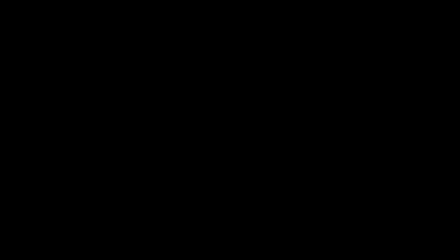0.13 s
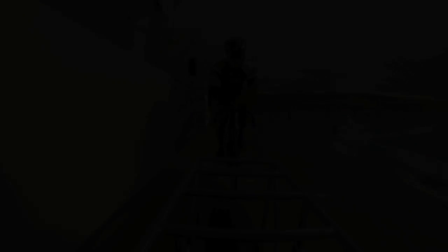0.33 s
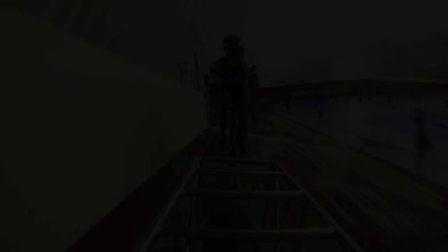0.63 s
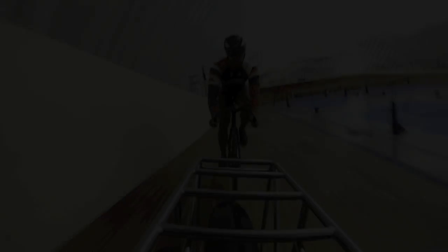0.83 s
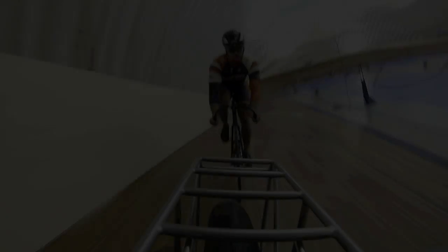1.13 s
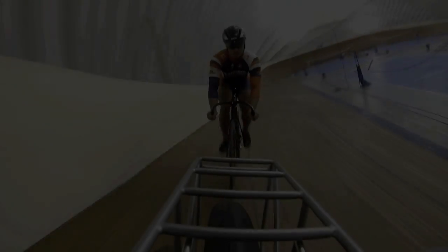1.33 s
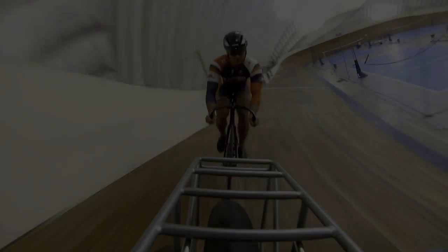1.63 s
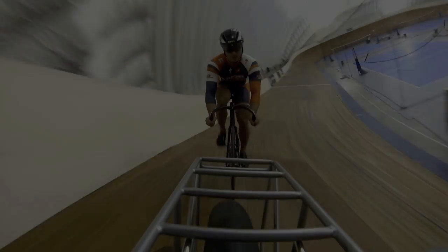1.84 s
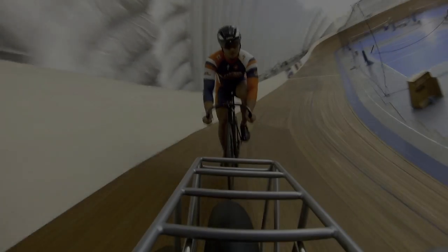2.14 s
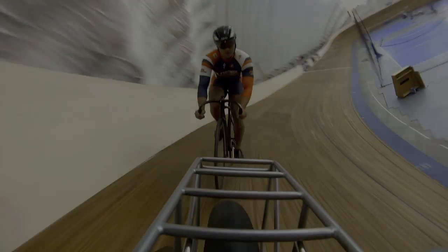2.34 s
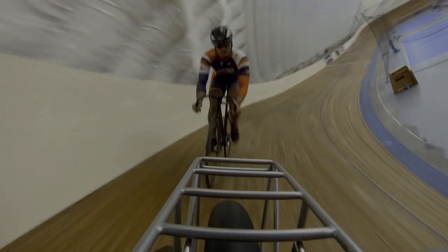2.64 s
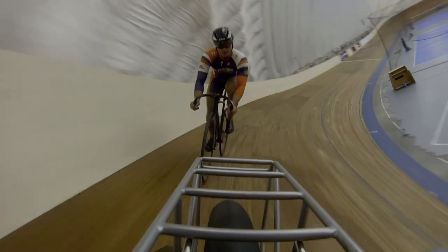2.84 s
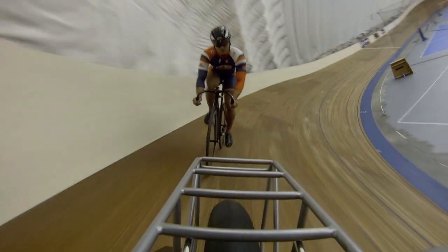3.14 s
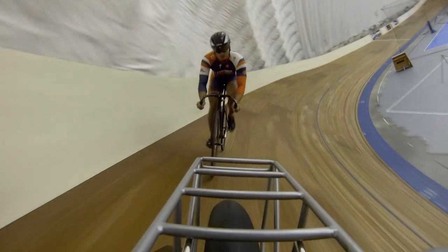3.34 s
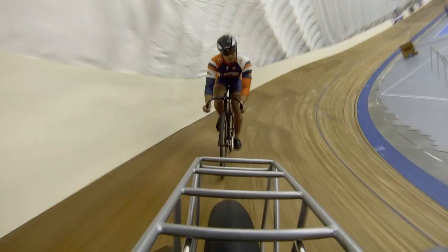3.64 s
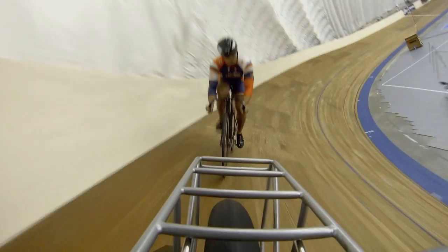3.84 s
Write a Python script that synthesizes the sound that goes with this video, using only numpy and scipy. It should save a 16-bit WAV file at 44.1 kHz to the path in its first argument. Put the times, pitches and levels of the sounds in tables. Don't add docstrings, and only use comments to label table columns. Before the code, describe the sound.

A motorbike drones low and steady on an indoor wooden cycling track, its steel rack humming under grainy road and wind rush; plastic rattles come in clusters as everything fades up from silence, heard from the bike.

```python
import sys
import numpy as np
from scipy import signal
from scipy.fft import rfft, irfft, next_fast_len
from scipy.io import wavfile
from scipy.ndimage import uniform_filter1d, minimum_filter1d, map_coordinates

SR = 44100
rng = np.random.default_rng(int(sys.argv[2]) if len(sys.argv) > 2 else 0)


def materialize(psi):
    bounded = np.clip(np.atleast_2d(psi).T, -1, 1)
    quanta = np.round(bounded * 32767).astype(np.int16)
    wavfile.write(sys.argv[1], SR, quanta)


def invert_db(x):
    u = np.asarray(x, float) / 20
    return 10 ** u


N = 176400

FADE_START_S, FADE_S = 0.071, 3.985

# (time [s], firing rate [Hz], thump level [dB])
ENGINE = [(0.15, 47.5, -54.5), (0.21, 48.2, -45), (0.62, 47.98, -41), (0.96, 48.86, -30),
          (1.24, 48.73, -36), (1.31, 50, -27.5), (1.45, 50.3, -41.5), (1.58, 49.23, -26), (1.7, 48.75, -38),
          (1.9, 48.8, -28.5), (2.45, 49.35, -24.5), (2.62, 47.93, -28.5), (2.79, 47.9, -24),
          (3.08, 47.76, -26.5), (3.31, 50.15, -23.5), (3.36, 50.44, -25.5), (3.47, 48.27, -25),
          (4.0, 48.7, -31)]
FIRING_WANDER, THUMP_WOBBLE_DB, THUMP_NOISE_DB = 0.02, 1.6, -11.5
# (time [s], level [dB])
ROAD_RUSH = [(.1, -37.5), (.5, -33), (1, -38.5), (1.3, -35), (1.57, -32.5), (1.63, -43.5), (1.75, -34),
             (1.93, -33), (2.2, -37), (2.5, -32), (2.75, -37.5), (3.0, -34.5), (3.25, -33.5), (3.6, -34.5),
             (4, -36)]
# (frequency [Hz], level [dB])
RUMBLE_COLOUR = [(12, -13), (22, -2), (50, -6), (85, -15.5), (130, -5), (300, -23.5), (480, -40),
                 (1500, -110)]
RUMBLE_DB = -25
# (time [s], peak level [dB])
LOW_THUDS = [
    (1.305, -29.5),
    (1.448, -18.5),
    (1.561, -18.5),
    (1.581, -18.5),
    (1.94, -15),
    (3.291, -12),
    (3.689, -6),
]
THUD_S = 0.0018

# (frequency [Hz], width [Hz], level [dB])
RACK_MODES = [(156.7, 20, 3), (197, 30, 2), (243, 59, -15.5)]
# (time [s], frequency [Hz], level [dB])
RACK_HUM = [(0.3, 153.9, -49.5), (0.61, 150.3, -36), (0.948, 152.8, -35), (1.06, 160.9, -35.5),
            (1.28, 150.8, -37), (1.388, 162.3, -34.5), (1.552, 154.7, -31), (2.02, 152.8, -30),
            (2.11, 155.9, -25), (2.17, 153.9, -35), (2.66, 155.4, -23), (2.92, 154.2, -26.5),
            (2.96, 152.3, -20.5), (3.29, 153.6, -26.5), (3.339, 153.4, -21.5), (3.45, 148.5, -25.5),
            (3.59, 154.8, -21), (4.0, 151.7, -21)]
HUM_WANDER, HUM_WOBBLE_DB, SHAKE_NOISE_DB = 0.005, 3, -9
# (frequency [Hz], width [Hz], level [dB])
HOLLOW_MODES = [(601, 44.3, 3.5), (675, 146, -6), (1082, 49, -16), (1308, 111, -11.5), (1530, 29, 1),
                (1627, 67, -1), (2134, 317, -5), (2840, 600, -8.5), (4940, 180, -28.5), (5070, 600, -27),
                (5750, 190, -23), (7900, 190, -34)]
# (frequency [Hz], level [dB])
RUSH_TILT = [(300, -36), (540, -2.5), (1000, 10), (3600, -8.5), (4300, -12.5), (4800, -4), (5900, -3),
             (6600, -17.5), (8000, -10), (9000, -53.5)]
# (frequency [Hz], level [dB])
HISS_COLOUR = [(7500, -30), (8800, 1), (10300, -7.5), (12300, 0.5), (14000, -8), (15500, -35.5)]
HISS_DB = -50.5

# (time [s], frequency [Hz], level [dB])
TREAD = [(0.2, 428.5, -44.5), (1.01, 417.5, -48), (1.1, 428, -46), (1.62, 402.6, -40.5), (2.51, 396.6, -40),
         (2.57, 409.7, -35), (2.7, 400.5, -45), (3.05, 410.5, -40.5), (3.33, 402.8, -42.5),
         (3.68, 416.6, -42), (3.76, 404, -37), (4.0, 413.4, -45)]
OCTAVE_DB, TREAD_WANDER, TREAD_WOBBLE_DB = -12.5, 0.00947, 3.5

# (time [s], level [dB])
SQUEAKS = [
    (.24, -64.5),
    (1.458, -40),
    (2.531, -35),
]
SQUEAK_HZ, SQUEAK_S = 2260, 0.023

# (time [s], case peak [dB], shell peak [dB])
CONTACTS = [(0.7058, -41.5, -44), (0.7118, -34, -34.5), (0.7185, -39, -37), (0.8308, -36.5, -42),
            (0.8361, -37, -38.5), (0.9123, -46.5, -53), (0.9171, -57.5, -53.5), (1.1607, -37.5, -49),
            (1.1711, -30.5, -39), (1.1815, -22, -29), (1.1843, -40.5, -33), (1.1909, -29, -32),
            (1.1962, -23.5, -43), (1.1998, -29.5, -28), (1.2054, -24, -33), (1.2115, -26.5, -29),
            (1.2735, -30, -36), (1.2767, -35, -35), (1.2806, -32, -27.5), (1.2838, -33.5, -33.0),
            (1.2876, -28.5, -38), (1.3056, -37.5, -37.5), (1.3318, -50.0, -49), (1.3365, -52, -48),
            (1.4003, -28, -26), (1.4044, -25, -46), (1.4099, -34.5, -33.0), (1.4677, -38.5, -52.0),
            (1.4732, -41.0, -54.0), (1.4766, -45.5, -54), (1.4841, -44, -50), (1.4899, -28, -24),
            (1.8816, -35, -38), (1.9279, -40, -57.0), (1.931, -33.0, -42), (1.9373, -31.5, -42.5),
            (2.0241, -42, -48), (2.054, -29, -25.5), (2.0589, -20, -28), (2.064, -27.0, -35),
            (2.0675, -28.5, -30), (2.0707, -34.5, -28.0), (2.0758, -29, -27), (2.0804, -34.5, -34),
            (2.135, -26, -29), (2.2168, -37, -58), (2.2783, -34.5, -49.0), (2.4383, -53, -48),
            (2.6411, -20, -24), (2.6463, -20, -21), (2.656, -27, -26), (2.6559, -26.0, -45),
                 (2.6615, -26.5, -29.0), (2.747, -45.5, -53), (2.7505, -44.5, -50.0), (2.758, -41.5, -48.0),
                 (2.7603, -37.5, -50), (2.767, -37, -40), (2.778, -32.0, -36.5), (2.9226, -30.5, -45),
                 (2.932, -43, -53), (2.943, -34.5, -46), (3.0665, -34.5, -47), (3.1319, -29.5, -46),
                 (3.1359, -34.5, -46), (3.135, -32.0, -49), (3.144, -48.5, -43), (3.147, -37, -42),
                 (3.177, -33.0, -45.0), (3.182, -24.5, -58), (3.1881, -36.5, -39), (3.1925, -29, -50),
                 (3.1962, -35, -47), (3.281, -31, -44), (3.2827, -27.5, -47), (3.2863, -31.5, -39.0),
                 (3.2929, -21.5, -17.5), (3.298, -34.5, -40), (3.536, -35, -47.5), (3.5575, -40, -44),
                 (3.5634, -32.5, -42), (3.7348, -16.5, -20), (3.7576, -27.5, -20), (3.834, -26.5, -46.0),
                 (3.8384, -24, -44), (3.8434, -34, -40), (3.849, -19.5, -18.5), (3.8532, -26.5, -19),
                 (3.857, -21.5, -22), (3.8609, -15.5, -22), (3.8652, -26.5, -22.0), (3.8703, -19, -15),
                 (3.8788, -19.5, -20.0), (3.9379, -23.5, -22), (3.9435, -27.5, -28.0), (3.9465, -21, -36),
                 (3.9491, -30, -21.5), (3.96, -27, -43.0)]
# (frequency [Hz], width [Hz], level [dB])
CASE_MODES = [(1653, 171, -0.5), (2127, 74.5, 4), (2750, 373, -5.5), (3365, 179, -1.5), (4027, 110, -7.5)]
# (frequency [Hz], level [dB])
CASE_TILT = [(600, 5), (950, -1), (1250, 0.5), (6000, -12.5), (7000, -14)]
# (frequency [Hz], width [Hz], level [dB])
LID_MODES = [(4568, 116, -5.5), (5000, 200, -4), (5517, 111, 1.5), (6350, 180, -16)]
# (frequency [Hz], width [Hz], level [dB])
SHELL_MODES = [(7290, 220, -5), (8090, 200, -0.5), (10000, 750, -16.5), (11260, 520, -14.5),
               (12950, 400, -8), (13600, 1100, -16.5), (15100, 640, -16.5)]
# (frequency [Hz], level [dB])
SHELL_TILT = [(5000, -23.5), (7000, -4), (8500, -3), (9300, -4), (10300, -23.5), (11000, -0.5),
              (15700, -3.5), (16300, -43.5)]
CHATTER_DB, KICK_DB, LID_DB, SHELL_DB = 4, -9, -11, -12.5
CLICK_SHARE, SCRAPE_DB = 0.72, -15
SCRAPE_T60_S, SHELL_T60_S = 0.021, 0.014
AFTER_DB, AFTER_T60_S = -31, 0.08

# (time [s], level [dB])
LONE_TICKS = [(1.562, -52.0), (1.582, -52.0), (1.7965, -66.5), (1.9689, -55), (1.9783, -56.5),
              (1.9896, -58), (2.2293, -57), (2.2612, -52), (2.3423, -56.5), (2.3977, -55), (2.543, -56),
              (2.6218, -55), (2.8046, -52), (2.8243, -45), (3.0845, -53.5), (3.1186, -49.5), (3.2356, -54),
              (3.413, -49.5), (3.5929, -53), (3.604, -46.5), (3.613, -53), (3.6968, -50.0)]
# (frequency [Hz], level [dB])
TICK_COLOUR = [(3000, -22), (5500, -1.5), (8000, -7), (11000, -19.5), (14000, -41)]
TICK_DB, TICK_GROWS, TICK_SPREAD_DB, LONE_DB = -73, 1.8, 2.5, -0.5

SLACK = 0.4


def unit(x):
    return x / np.sqrt(np.mean(x ** 2) + 1e-20)


def along(points, hz):
    f, v = np.transpose(points)
    return np.interp(np.log(hz + 1), np.log(f + 1), v)


def colour(points):
    return lambda f: invert_db(along(points, f))


def curves(rows):
    s, *cols = np.transpose(rows)
    return [np.interp(np.arange(N) / SR, s, c) for c in cols]


def wobble(rate):
    knots = rng.standard_normal(int(N * rate / SR) + 4)
    return map_coordinates(knots, [np.arange(N) * rate / SR])


def turning(hz):
    return 2 * np.pi * np.cumsum(hz) / SR


def filtered(x, response):
    m = next_fast_len(len(x) + SR // 2)
    return irfft(rfft(x, m) * response(np.fft.rfftfreq(m, 1 / SR)), m)[:len(x)]


def modes(table, tilt=((1, 0),)):
    def response(f):
        total = 0
        for k, (centre, width, db) in enumerate(table):
            damping = 1j * f * width
            total = total + (-1) ** k * invert_db(db) * damping / (centre * centre - f * f + damping)
        return invert_db(along(tilt, f)) * total
    return response


def patchy(patchy_db):
    z = signal.stft(rng.standard_normal(N), nperseg=512)[2]
    field = uniform_filter1d(rng.standard_normal(z.shape), 5, 0)
    field = uniform_filter1d(field, 8, 1)
    return signal.istft(z * invert_db(patchy_db * unit(field)), nperseg=512)[1][:N]


def fade(s):
    return np.clip((s - FADE_START_S) / FADE_S, 0, 1)


def engine():
    t = np.arange(N) / SR
    hz, level_db = curves(ENGINE)
    tone = np.sqrt(2) * np.sin(turning(hz * (1 + FIRING_WANDER * wobble(9.9))))
    blur = unit(filtered(rng.standard_normal(N), modes([(47.0, 15, 0)], [(70, -0.5), (300, -61)])))
    thump = invert_db(level_db + THUMP_WOBBLE_DB * wobble(9)) * (tone + invert_db(THUMP_NOISE_DB) * blur)
    thump = thump / fade(np.maximum(t, ENGINE[0][0]))

    road_db, = curves(ROAD_RUSH)
    rough = rng.standard_normal(N) * invert_db(1.2 * road_db + 1.9 * wobble(20))
    rumble = unit(filtered(rough, colour(RUMBLE_COLOUR)))

    thuds = np.zeros(N)
    for s, db in LOW_THUDS:
        u = (t - s) / THUD_S
        thuds += invert_db(db) / fade(s) * (1 - u ** 2) * np.exp(-u ** 2 / 2)
    return thump + invert_db(RUMBLE_DB) * rumble + thuds


def boards():
    t = np.arange(N) / SR
    hz, hum_db = curves(RACK_HUM)
    tone = np.sqrt(2) * np.sin(turning(hz * (1 + HUM_WANDER * wobble(25.08))))
    hum = invert_db(HUM_WOBBLE_DB * wobble(18)) * tone
    ring = modes(RACK_MODES)
    shake = unit(filtered(rng.standard_normal(N), lambda f: ring(f) / (1 + (f / 300) ** 4)))
    rack = invert_db(hum_db - 1.5) * (hum + invert_db(SHAKE_NOISE_DB) * shake)
    rack = rack / fade(np.maximum(t, RACK_HUM[0][0]))

    rush_db, = curves(ROAD_RUSH)
    grit = patchy(patchy_db=2.0) * invert_db(1.63 * wobble(150) + 0.27 * wobble(9.9))
    rush = unit(filtered(grit, modes(HOLLOW_MODES, RUSH_TILT)))
    gusts = patchy(patchy_db=3.5) * invert_db(2.8 * wobble(12) + 4.5 * wobble(110))
    hiss = unit(filtered(gusts, lambda f: colour(HISS_COLOUR)(f) * (f > 6000)))
    return rack + invert_db(rush_db) * (rush + invert_db(HISS_DB) * hiss)


def tyre():
    hz, level_db = curves(TREAD)
    phase = turning(hz * (1 + TREAD_WANDER * wobble(45)))
    octave = invert_db(OCTAVE_DB + 2.4 * wobble(25.21)) * np.sin(2 * phase)
    return invert_db(level_db + TREAD_WOBBLE_DB * wobble(25.82)) * np.sqrt(2) * (np.sin(phase) + octave)


def squeaks():
    t = np.arange(N) / SR
    swell = np.zeros(N)
    for s, db in SQUEAKS:
        swell += invert_db(db) / fade(s) * np.exp(-((t - s) / SQUEAK_S) ** 2 * 4)
    return swell * np.sin(turning(SQUEAK_HZ * (1 + 0.0036 * wobble(40))))


def struck_at(s, db):
    hits = np.zeros(N)
    np.add.at(hits, np.round(s * SR).astype(int), invert_db(db) / fade(s))
    return hits


def struck(hits, table, tilt, t60):
    t = np.arange(SR // 8) / SR
    dying = invert_db(SCRAPE_DB - 60 * t / t60)
    dying = dying + invert_db(SCRAPE_DB + AFTER_DB - 60 * t / AFTER_T60_S)
    scrape = signal.fftconvolve(hits, dying)[:N] * rng.standard_normal(N)
    ring = modes(table, tilt)
    peak = np.abs(filtered(signal.unit_impulse(2000), ring)).max()
    return filtered(CLICK_SHARE * hits + scrape, ring) / peak


def dull_ticks(shaking):
    swing = -unit(uniform_filter1d(shaking, size=40))
    highest_nearby = -minimum_filter1d(-swing, size=201)
    tops = (swing == highest_nearby) * np.clip(swing, 0, 3)
    spread = np.clip(rng.standard_normal(N), -2, 2)
    ticks = tops ** TICK_GROWS * invert_db(TICK_DB + TICK_SPREAD_DB * spread)
    ticks = ticks + invert_db(LONE_DB) * struck_at(*np.transpose(LONE_TICKS))
    bursts = signal.fftconvolve(ticks, np.hanning(90), "same") * rng.standard_normal(N)
    return 4 * filtered(bursts, colour(TICK_COLOUR))


def chatter(shaking):
    s, case_db, shell_db = np.transpose(CONTACTS)
    hits, hard = struck_at(s, case_db), struck_at(s, shell_db)
    kicks = 20 * invert_db(KICK_DB) * filtered(hits, modes(RACK_MODES[:1]))
    case = struck(hits, CASE_MODES, CASE_TILT, SCRAPE_T60_S)
    lid = struck(np.sqrt(hits * hard), LID_MODES, CASE_TILT, SCRAPE_T60_S)
    shell = struck(hard, SHELL_MODES, SHELL_TILT, SHELL_T60_S)
    bright = shell + dull_ticks(shaking)
    return kicks + invert_db(CHATTER_DB) * (case + invert_db(LID_DB) * lid + invert_db(SHELL_DB) * bright)


def scene():
    shaking = engine() + boards()
    lopsided = SLACK * filtered(shaking ** 2, lambda f: (f > 25) / (1 + (f / 420) ** 4))
    return (shaking - lopsided + tyre() + squeaks() + chatter(shaking))[None]


def band_limit(x):
    return signal.sosfilt(signal.butter(12, 15950, fs=SR, output="sos"), x)


def record(dry):
    mix = dry * fade(np.arange(N) / SR)
    return band_limit(mix)


dry = scene()
out = record(dry)
materialize(out)
```